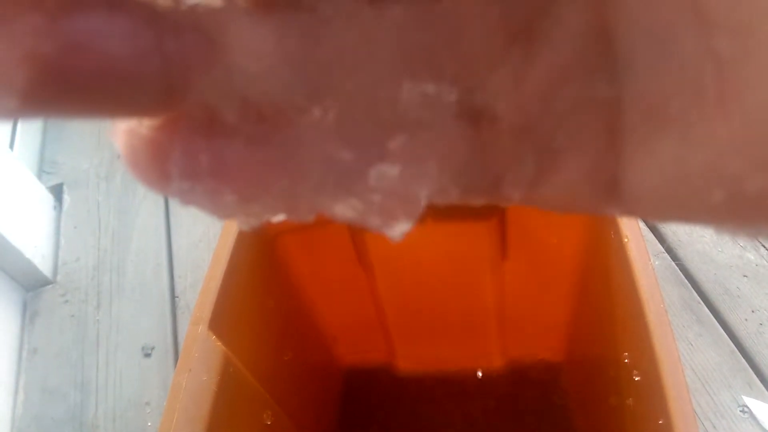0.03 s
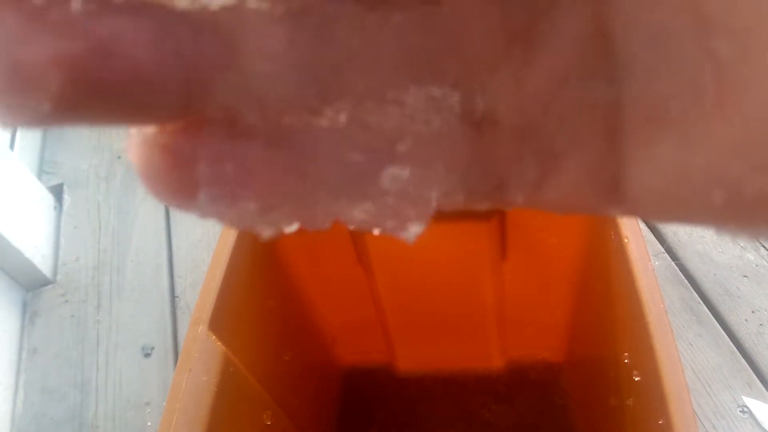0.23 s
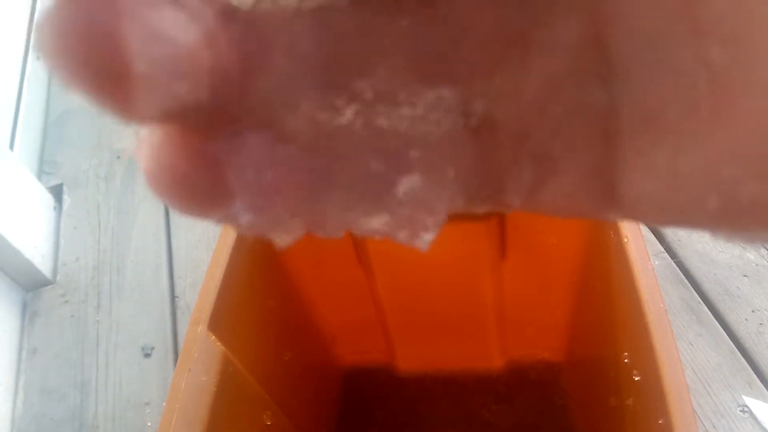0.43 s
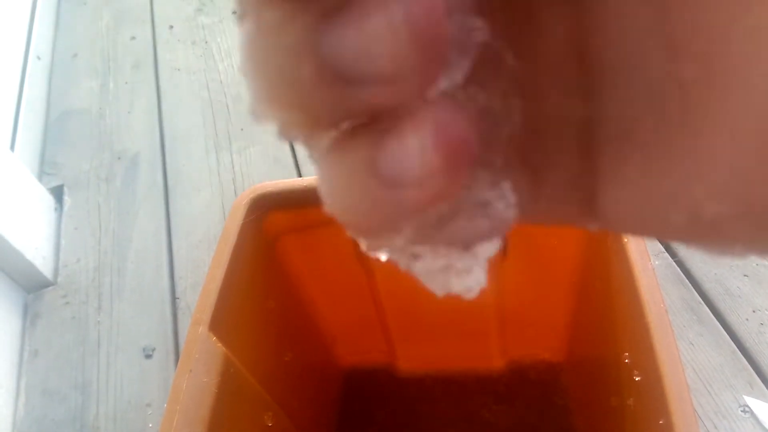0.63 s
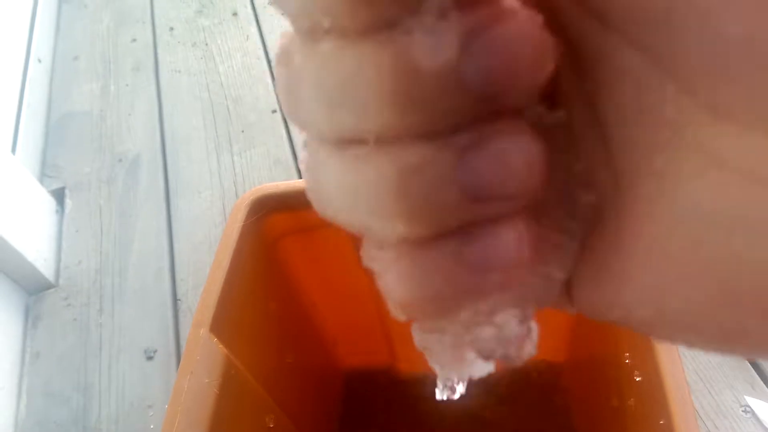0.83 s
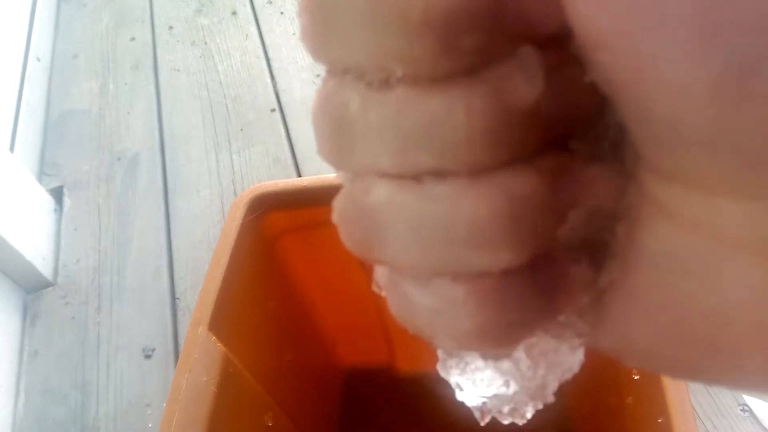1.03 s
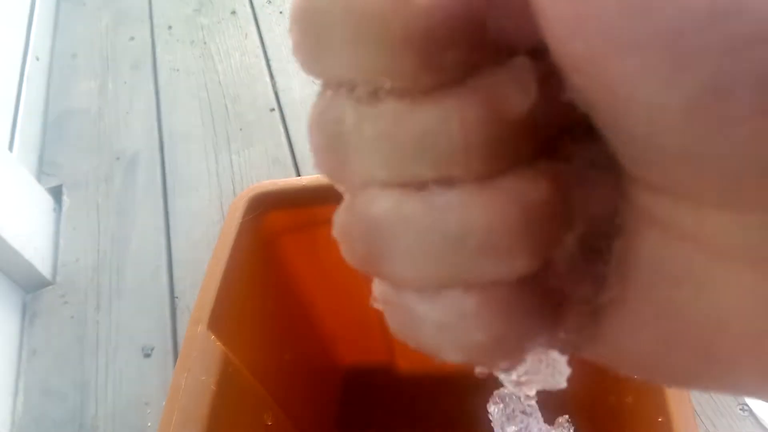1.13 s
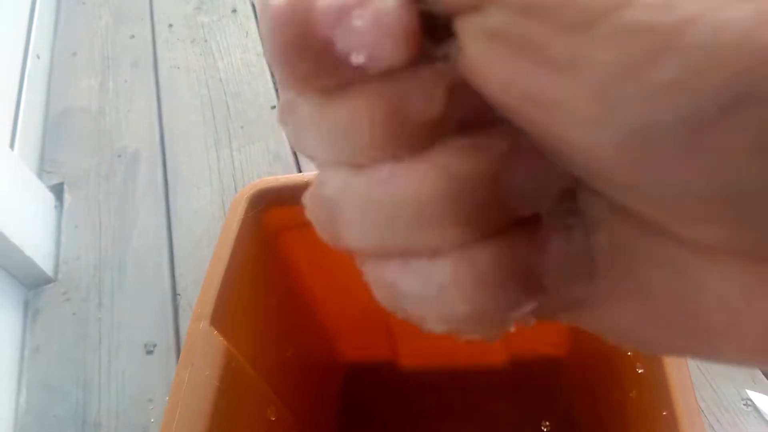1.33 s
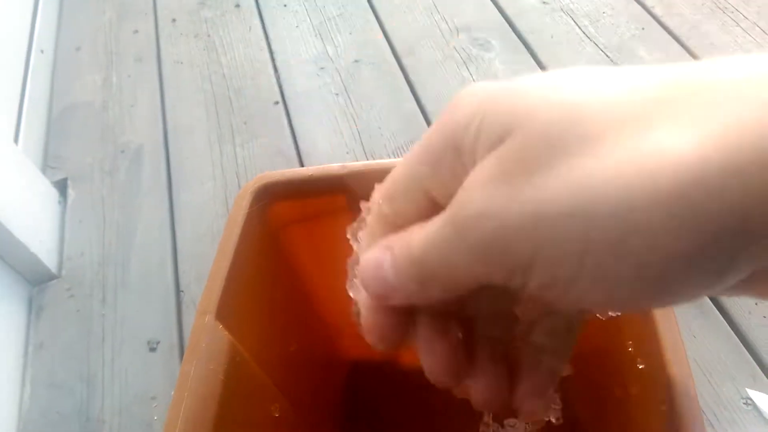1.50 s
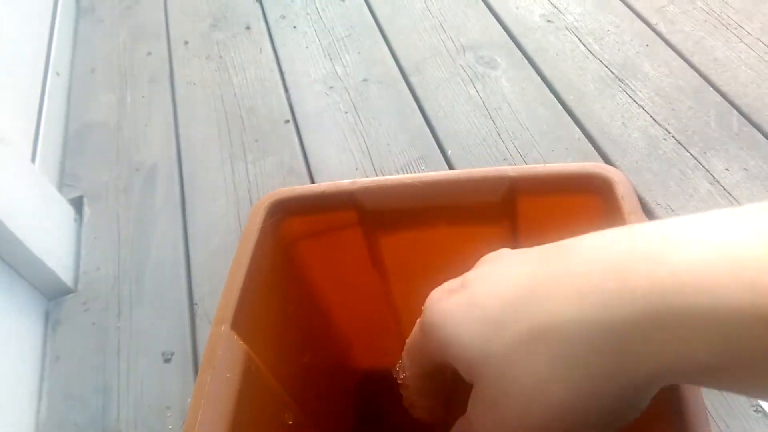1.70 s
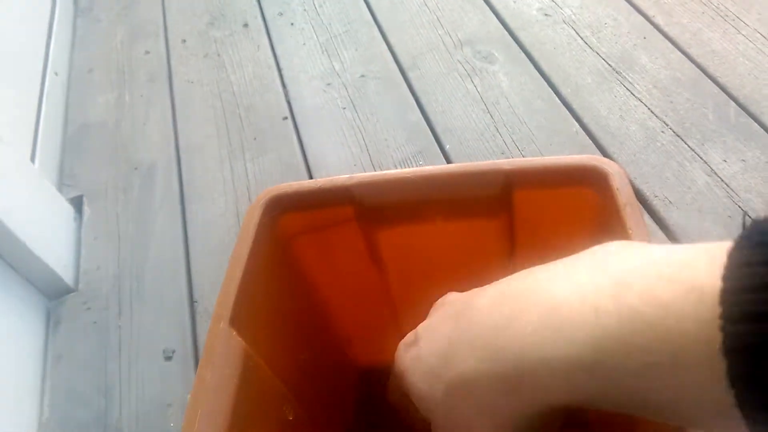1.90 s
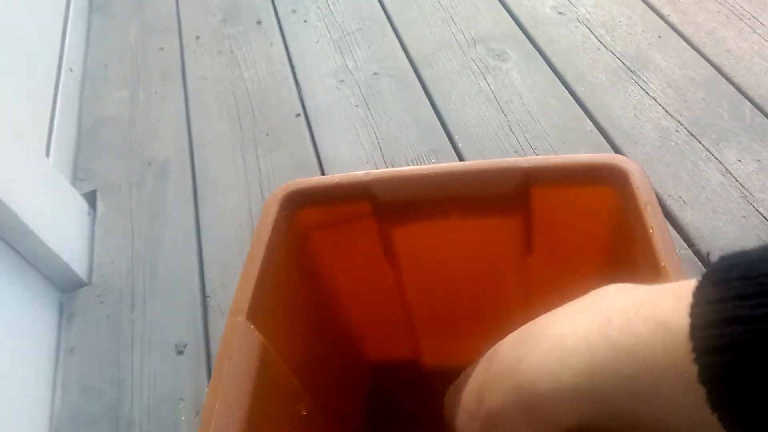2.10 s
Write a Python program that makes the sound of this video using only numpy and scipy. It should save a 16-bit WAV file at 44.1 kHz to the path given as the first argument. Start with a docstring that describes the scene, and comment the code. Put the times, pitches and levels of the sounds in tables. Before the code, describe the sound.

Wet gel splats and clicks as a hand squeezes it over a plastic tub.

```python
"""An outdoor deck by a house wall, a stereo pair of microphones close on a plastic tub.
A hand squeezes soft wet gel over the tub, then reaches down into it. Lumps land with a splat,
trap small bubbles and set the tub booming; the gel snaps and squelches in the fist.
Tub and wall throw back short echoes. Under it lie a quiet outdoor background,
a high microphone hiss and the faint rustle of the arm."""
import sys
import numpy as np
from scipy import signal
from scipy.fft import rfft, irfft, next_fast_len
from scipy.io import wavfile

SR = 44100
rng = np.random.default_rng(int(sys.argv[2]) if len(sys.argv) > 2 else 0)


def materialize(psi):
    """Save the field psi as 16-bit PCM at rate SR to the path in sys.argv[1].

    A 1-D psi becomes a single channel; in a 2-D psi each row is a channel.
    """
    bounded = np.clip(np.atleast_2d(psi).T, -1, 1)
    quanta = np.round(bounded * 32767).astype(np.int16)
    wavfile.write(sys.argv[1], SR, quanta)


N = 94815
T = np.arange(N) / SR


def from_db(db):
    """Decibels to gain."""
    return 10 ** (np.asarray(db) / 20)


def at_hz(points, hz):
    """Reads a table on a log-frequency axis."""
    f, value = np.transpose(points)
    return np.interp(np.log(np.maximum(hz, 1)), np.log(f), value)


def gain_curve(points):
    """Gain over time from (time [s], level [dB]) rows."""
    return from_db(np.interp(T, *np.transpose(points)))


def noise(colour, likeness=0., tilt_db=0.):
    """Stereo noise of rms 1 with a colour, a left-right likeness and a tilt per octave above 400 Hz."""
    size = next_fast_len(N)
    hz = np.maximum(np.arange(size // 2 + 1) * SR / size, 1)
    alike = at_hz(likeness, hz) if np.ndim(likeness) else likeness
    mid, side = rfft(rng.standard_normal((2, size)))
    spectrum = np.sqrt(1 + alike) * mid + np.sqrt(1 - alike) * side * np.array([[1], [-1]])
    shape_db = at_hz(colour, hz) + tilt_db * np.log2(np.maximum(hz, 400))
    x = irfft(spectrum * from_db(shape_db), size)[:, :N]
    return x / x.std()


def since(s):
    """Seconds since an onset, zero before it."""
    return np.maximum(T - s, 0)


def fade(t, t60):
    """Exponential decay, 60 dB down at t60."""
    return np.exp(-np.minimum(np.log(1000) * t / t60, 40))


def ring(s, hz, t60, rise=0.):
    """A dying sine whose pitch may rise by a share per second."""
    t = since(s)
    return np.sin(2 * np.pi * hz * t * (1 + .5 * rise * t)) * fade(t, t60)


def pan(db):
    """Microphone gains, the left louder than the right by db."""
    return from_db(np.array([[.5], [-.5]]) * db)


def low_cut(x, hz, order):
    """High-pass filter."""
    return signal.sosfilt(signal.butter(order, hz, "high", fs=SR, output="sos"), x)


def pops(rows, rise=0., right_lag_s=.00005):
    """Small air pockets ring briefly and radiate no bass; the right microphone hears them later."""
    out = 0
    for s, hz, db, t60, pan_db in rows:
        pair = np.array([ring(s + lag, hz, t60, rise) for lag in (0, right_lag_s)])
        out += from_db(db) * pan(pan_db) * pair
    return low_cut(out, hz=3060, order=3)


def reflections(x, colour, t60, delay, likeness=0.):
    """Dense dying echoes of unit energy."""
    response = noise(colour, likeness) * fade(since(delay), t60) * (T > delay)
    response /= np.sqrt(np.sum(response ** 2, axis=1, keepdims=True))
    return signal.fftconvolve(x, response, axes=1)[:, :N]


# outdoor background, with microphone hiss at the top: (frequency [Hz], level [dB])
BACKGROUND_COLOUR = [(15, -33), (28, -2.5), (100, -1), (135, -1), (200, -4.5), (320, -13.5), (560, -12),
                     (720, -15.5), (900, -11.5), (1200, -19), (2000, -18.5), (3200, -23.5), (5000, -26.5),
                     (8000, -28), (12500, -21.5), (16000, -29)]
# its level, dipping after the first splat and slowly recovering: (time [s], level [dB])
BACKGROUND_LEVEL = [(0, -65), (.35, -60.5), (.55, -66), (.78, -66), (1.0, -61.5), (1.4, -60.5),
                    (1.8, -58.5), (2.15, -64)]
# how alike it is at the two microphones: (frequency [Hz], likeness [0-1])
BACKGROUND_LIKENESS = [(30, 0.75), (120, 0.91), (350, 0.48), (1000, 0.023), (3000, 0.043), (16000, 0)]
def background():
    """Quiet outdoor background with a high microphone hiss."""
    return gain_curve(BACKGROUND_LEVEL) * noise(BACKGROUND_COLOUR, BACKGROUND_LIKENESS)


# the arm over the tub: (time [s], level [dB])
RUSTLE_LEVEL = [(0, -94), (.9, -86), (1.1, -74), (1.25, -90), (1.45, -67.5), (1.57, -63), (1.70, -64.5),
                (1.79, -61), (1.87, -72), (2.15, -76.5)]
# its rustle: (frequency [Hz], level [dB])
RUSTLE_COLOUR = [(30, -16), (200, 2.5), (1000, -8.5), (2000, 0), (5000, -1.5), (8000, -5), (12000, -22.5),
                 (16000, -17.5)]
def arm_rustle():
    """The moving arm rustles faintly, most as it reaches down."""
    return gain_curve(RUSTLE_LEVEL) * noise(RUSTLE_COLOUR, likeness=.2)


# down in the tub: (time [s], pitch [Hz], level before low cut [dB], t60 [s], pan L-R [dB])
BUBBLES = [(0.1398, 8300, -42.5, .006, 14.5), (0.1427, 8570, -22.5, 0.0023, 16.5),
           (0.1493, 3076, -16.5, 0.026, 3.5), (0.1511, 4340, -16.5, .009, 1),
           (0.1520, 2730, -36, 0.034, 13), (0.1532, 5160, -21.5, 0.0052, 5), (0.1562, 4810, -28, 0.01, 3),
           (0.1710, 2845, -32, 0.0045, 9.5), (1.5191, 3940, -12.5, 0.0029, 10.5),
           (1.5192, 6200, -24.5, 0.0058, 16), (1.5210, 3580, -21.5, 0.013, 5),
           (1.5230, 3334, -34.5, .028, 17), (1.5240, 4470, -36, 0.015, 13), (1.7106, 9060, -44, 0.01, 19.5),
           (1.9341, 7970, -42.5, 0.011, 6.5)]
def trapped_bubbles():
    """Air trapped by the lumps rings with a slightly rising pitch."""
    return pops(BUBBLES, rise=.8)


# lumps landing: (time [s], level [dB], t60 [s], tilt [dB/octave], pan L-R [dB])
SPLATS = [(0.1416, -46, 0.043, -7, 4), (0.1429, -38, 0.042, 3.5, 15), (0.1487, -28.5, 0.028, 1.5, 0),
          (0.18, -52.5, 0.06, -3, -6), (1.0763, -52.5, 0.038, -0.5, 5), (1.4054, -47.5, 0.01, -1.8, -3),
          (1.3282, -45, 0.027, -0.5, 4), (1.5184, -27, 0.021, 1.5, 0), (1.71, -39, 0.027, 2, 0.5),
          (1.7671, -43, 0.038, -7.5, -5), (1.7791, -45, 0.023, -3.5, -1), (1.933, -48.5, 0.028, 1, 1)]
# spatter before each lump's tilt: (frequency [Hz], level [dB])
SPLAT_COLOUR = [(30, -51), (150, -10), (500, 2), (700, 0.5), (950, 1.5), (1300, -5.5), (1800, -6),
                (3000, -1), (5500, -1), (9000, -3), (12000, -7.5), (15000, -10.5), (16000, -5)]
def splats(attack_s=.00018, grain_db=5):
    """Each wet lump bursts into a short, grainy spatter."""
    out, grain_times = 0, T[::20]
    for s, db, t60, tilt_db, pan_db in SPLATS:
        t = since(s)
        grain = from_db(grain_db * np.interp(T, grain_times, rng.standard_normal(len(grain_times))))
        envelope = (1 - np.exp(-t / attack_s)) * fade(t, t60) * grain
        spatter = noise(SPLAT_COLOUR, likeness=.045, tilt_db=tilt_db)
        out += from_db(db) * pan(pan_db) * envelope * spatter
    return out


# blows on the tub: (time [s], boom [dB], upper boom [dB], walls [dB], hollow [dB], t60 factor [ratio])
BLOWS = [(0.1421, -21, -44, -38.5, -31.5, 0.2), (0.1490, -31.5, -34, -39, -37.5, 1.02),
         (0.941, -54.5, -56, -65, -76, 0.77), (1.0778, -48.5, -56, -61, -74, 0.67),
         (1.3298, -35, -46.5, -61, -56, 0.96), (1.5186, -36, -42.5, -52, -45, .85),
         (1.7112, -44.5, -54, -58, -45, 0.61), (1.7680, -30.5, -38.5, -52.5, -51, 0.9),
         (1.7699, -31.5, -25, -44.5, -64, 0.84), (1.8007, -29.5, -35.5, -60.5, -71, 1.14),
         (1.8280, -34.5, -44, -54, -84, 0.42), (1.9343, -64, -64, -84, -87, 0.57)]
# the tub's four groups of modes: (frequency [Hz], relative level [dB], free t60 [s])
BOOM = [(96.8, -2.5, 0.26), (112.4, -5, 0.16)]
UPPER_BOOM = [(174.9, -4, 0.25), (204, -6.5, 0.26), (259, -17.5, 0.05)]
WALLS = [(335, -8.5, 0.117), (426.4, -0.5, 0.17), (479, -11, 0.055), (541, -16, 0.12), (713.5, -10.5, 0.12)]
HOLLOW = [(963.4, 2.5, 0.051), (1296, 1.5, .03)]
def tub_boom(attack_s=.0015, hand_rest_s=1.875):
    """Soft blows set the tub's floor, walls and hollow ringing; the gel and the resting hand damp them."""
    out = np.zeros(N)
    hand_damping = fade(since(hand_rest_s), t60=.12)
    for s, *levels, t60_factor in BLOWS:
        envelope = (1 - np.exp(-since(s) / attack_s)) * (hand_damping if s < hand_rest_s else 1)
        for db, modes in zip(levels, (BOOM, UPPER_BOOM, WALLS, HOLLOW)):
            for hz, mode_db, t60 in modes:
                out += from_db(db + mode_db) * envelope * ring(s, hz, t60 * t60_factor)
    return low_cut(out, hz=94, order=4) * pan(0)


# in the fist: (time [s], pitch [Hz], level before low cut [dB], t60 [s], pan L-R [dB])
SNAPS = [(0.8026, 9040, -36.5, 0.0011, 9), (0.8043, 6900, -47.5, 0.0041, -6),
         (1.0632, 3300, -39, 0.0014, 13), (1.1425, 7600, -50, 0.0023, 9), (1.2418, 9500, -45.5, 0.0037, 20),
         (1.4051, 4500, -29, 0.00067, -7)]
def gel_snaps():
    """Tiny air pockets pop in the squeezed gel."""
    return pops(SNAPS)


# air forced out of the gel, left of centre: (time [s], level [dB])
SPURTS = [(1.4675, -47.5), (1.4699, -40.5), (1.4722, -45), (1.4754, -43), (1.4844, -52), (1.49, -52)]
# its fizz: (frequency [Hz], level [dB])
FIZZ_COLOUR = [(1500, -19), (3200, 5), (5000, -6), (7000, 2), (9000, -4), (12000, -22)]
def squelch(start_hz=3440, end_hz=2270, fall_s=.0046):
    """Spurts fizz through a pocket whose pitch falls as it widens."""
    out, hiss = 0, from_db(-7) * noise(FIZZ_COLOUR)
    for s, db in SPURTS:
        hz = end_hz + (start_hz - end_hz) * np.exp(-(s - SPURTS[0][0]) / fall_s)
        fizz = hiss * fade(since(s), t60=.018) * (T > s)
        out += from_db(db) * (ring(s, hz, t60=.013) + fizz)
    return out * pan(11)


# echoes close by, inside the tub: (frequency [Hz], level [dB])
TUB_ECHO_COLOUR = [(200, 1), (1000, 0), (3200, -5.5), (6000, -11.5), (10000, -9), (16000, -2.5)]
# echoes from the house wall, farther off: (frequency [Hz], level [dB])
WALL_ECHO_COLOUR = [(200, -3.5), (900, 0), (1600, -2), (3000, -1), (5500, -4), (9000, -4), (16000, -12.5)]
def echoes(bubbles, spatter, boom, snaps, squeeze, wall_delay_s=.012):
    """The wet sounds reflect in the tub and off the house wall; the boom leaves a low tail."""
    gel = spatter + from_db(3.5) * snaps + from_db(-3) * squeeze
    into_tub = gel + from_db(.5) * bubbles
    to_wall = gel + from_db(-9.5) * bubbles  # the tub shields its bubbles from the deck
    near = reflections(into_tub, TUB_ECHO_COLOUR, t60=.096, delay=.00035)
    far = reflections(to_wall, WALL_ECHO_COLOUR, t60=.38, delay=wall_delay_s)
    rumble = reflections(boom, [(100, .0055), (16000, 0)], t60=.32, delay=wall_delay_s, likeness=.7)
    return from_db(-8.5) * near + from_db(-23) * far + from_db(-16) * rumble


def scene():
    """At the microphones: background and arm underneath, gel and tub up close, their echoes behind."""
    bed = background() + arm_rustle()
    close = trapped_bubbles(), splats(), tub_boom(), gel_snaps(), squelch()
    return bed + sum(close) + echoes(*close)


def record(dry, cutoff_hz=15750):
    """A steep low-pass on both microphones cuts the top."""
    return signal.sosfilt(signal.ellip(10, .1, 70, cutoff_hz, fs=SR, output="sos"), dry)


dry = scene()
out = record(dry)
materialize(out)
```